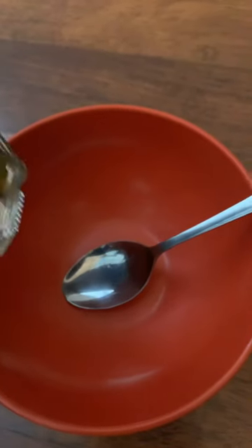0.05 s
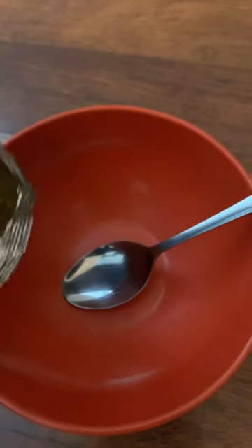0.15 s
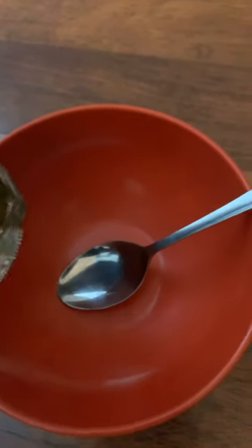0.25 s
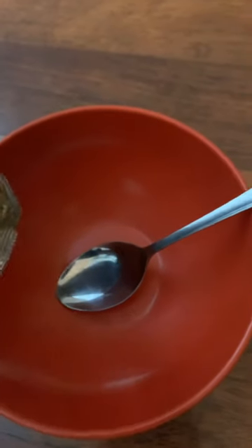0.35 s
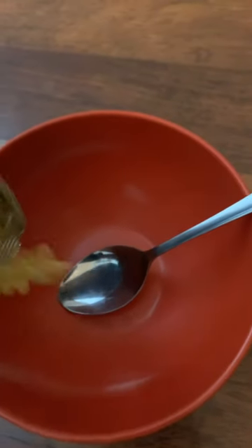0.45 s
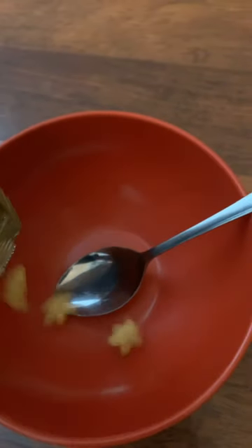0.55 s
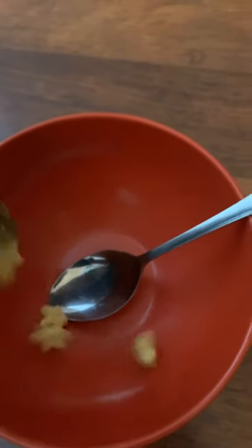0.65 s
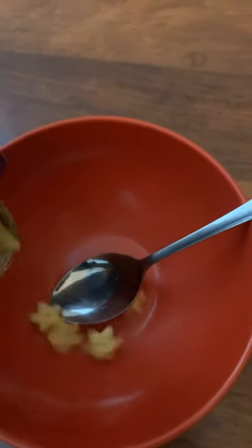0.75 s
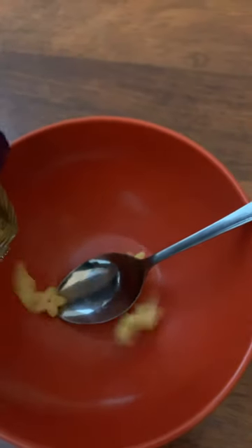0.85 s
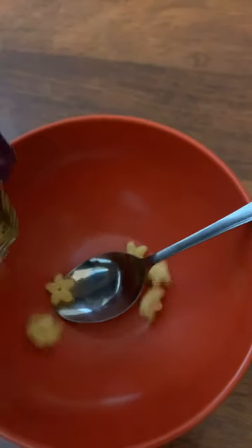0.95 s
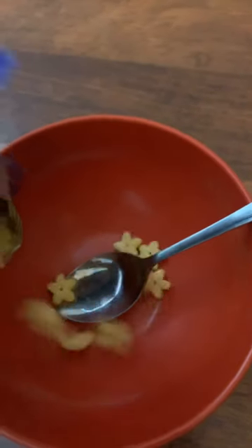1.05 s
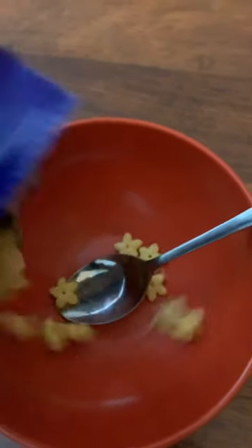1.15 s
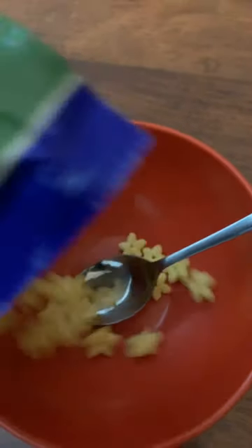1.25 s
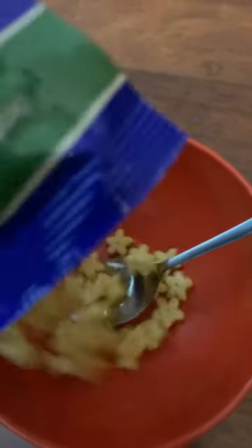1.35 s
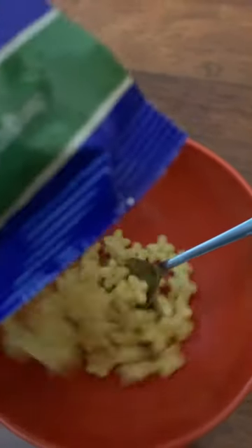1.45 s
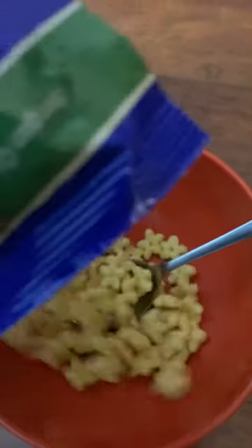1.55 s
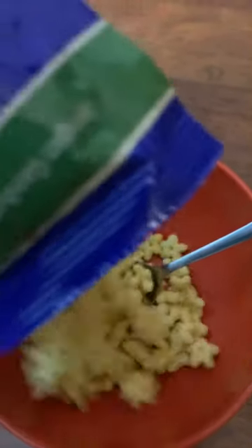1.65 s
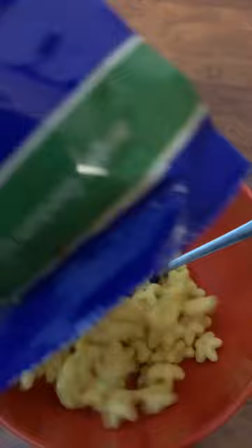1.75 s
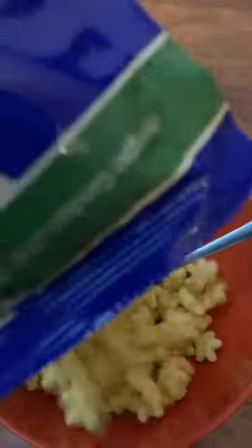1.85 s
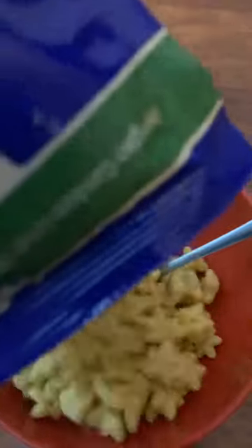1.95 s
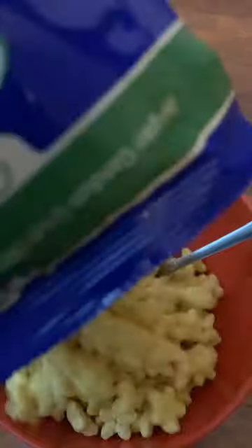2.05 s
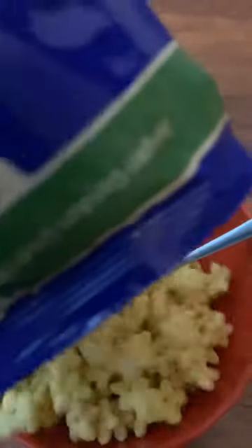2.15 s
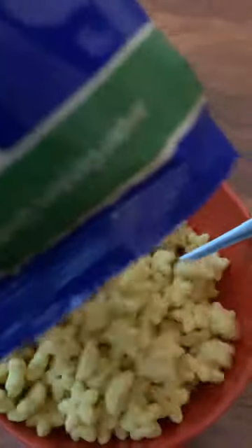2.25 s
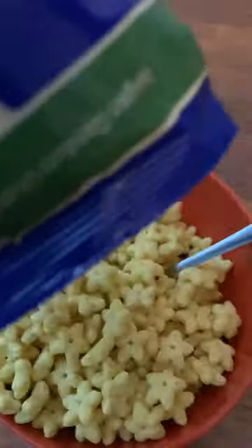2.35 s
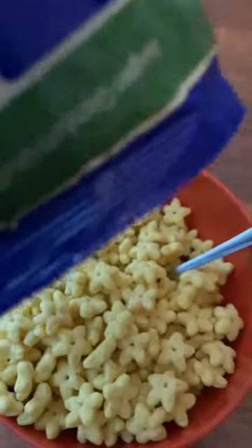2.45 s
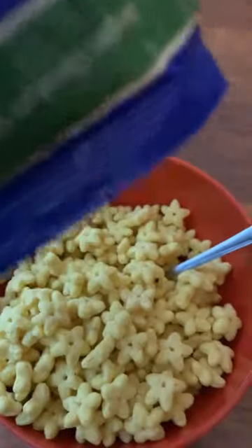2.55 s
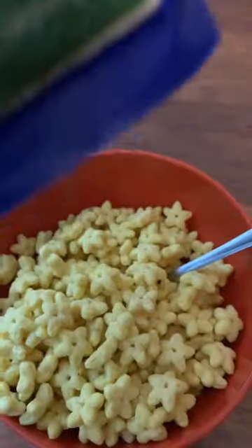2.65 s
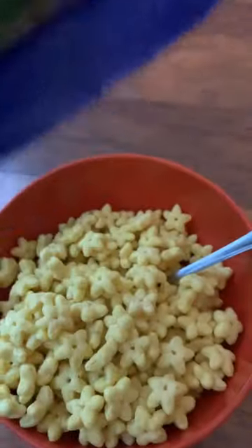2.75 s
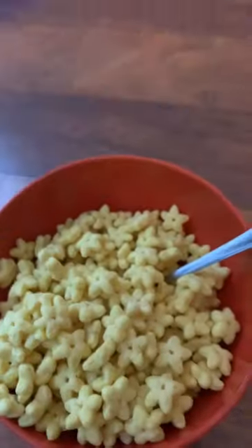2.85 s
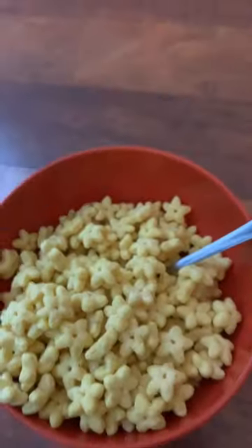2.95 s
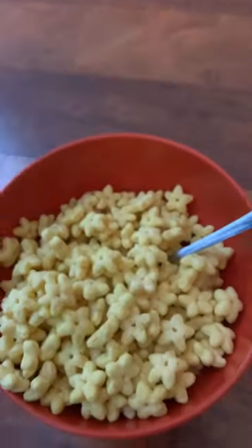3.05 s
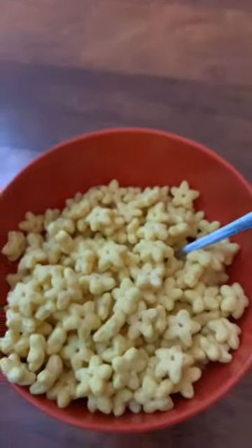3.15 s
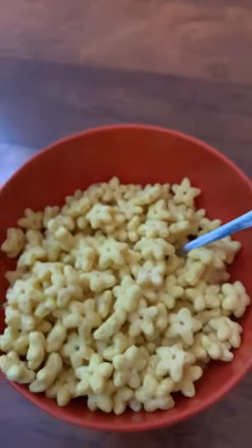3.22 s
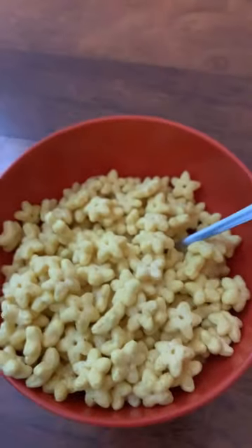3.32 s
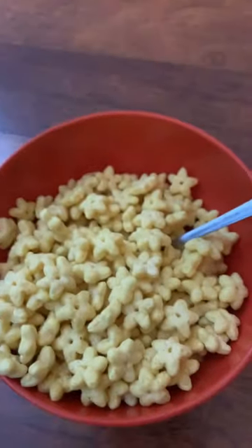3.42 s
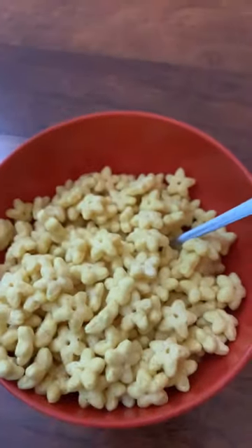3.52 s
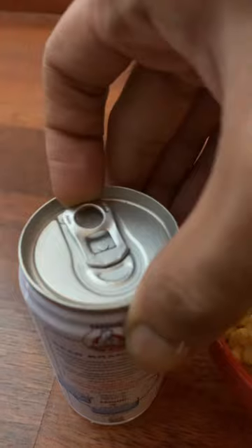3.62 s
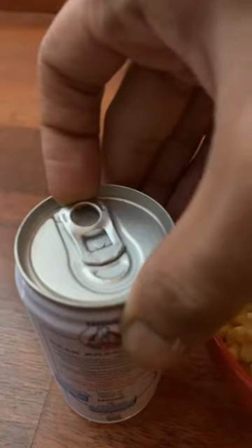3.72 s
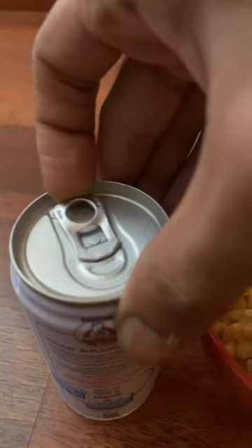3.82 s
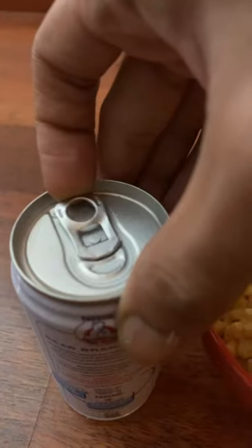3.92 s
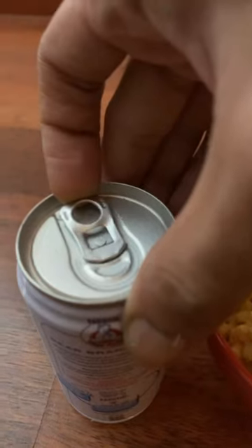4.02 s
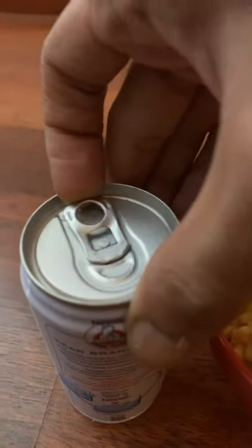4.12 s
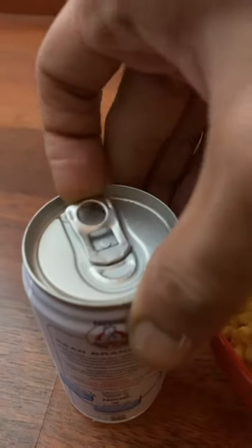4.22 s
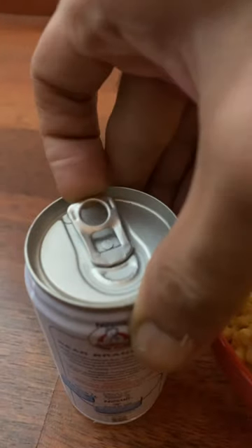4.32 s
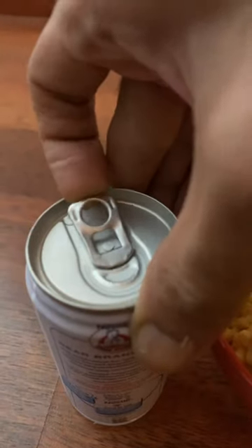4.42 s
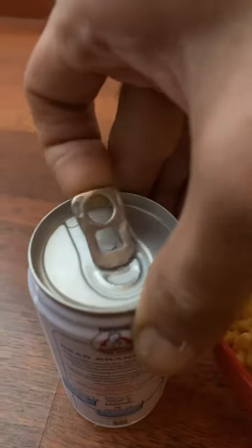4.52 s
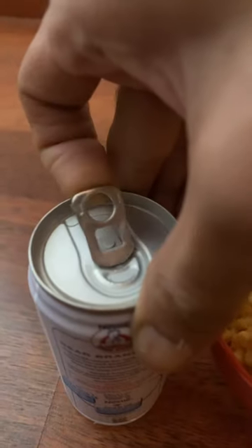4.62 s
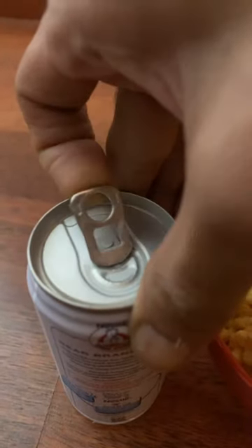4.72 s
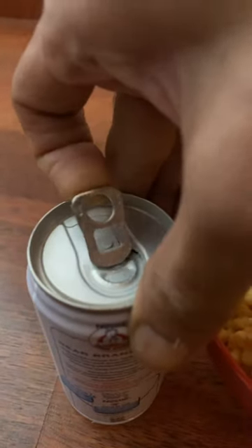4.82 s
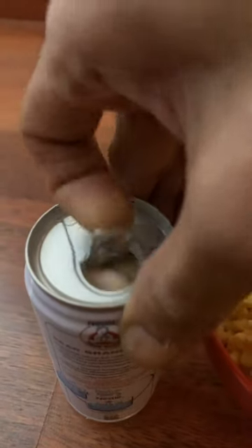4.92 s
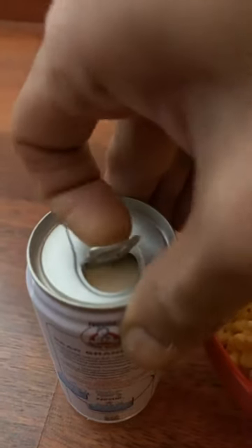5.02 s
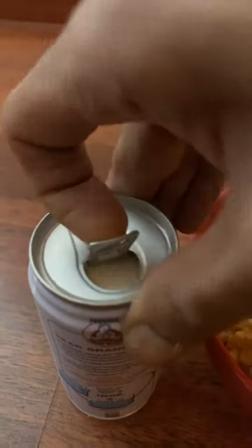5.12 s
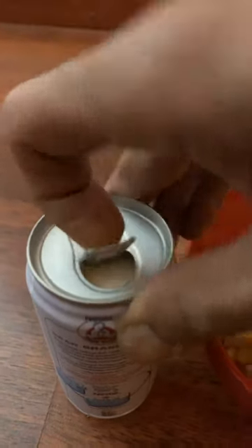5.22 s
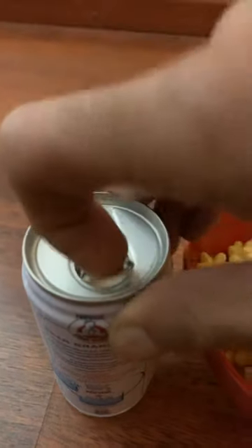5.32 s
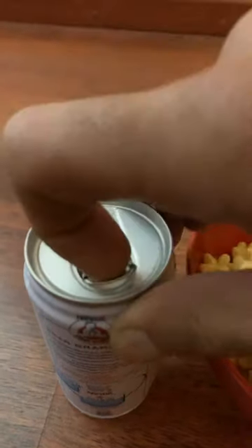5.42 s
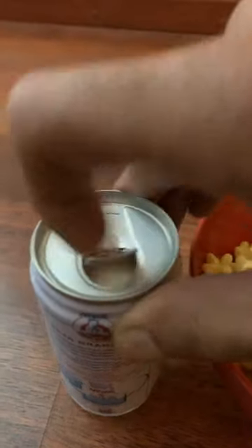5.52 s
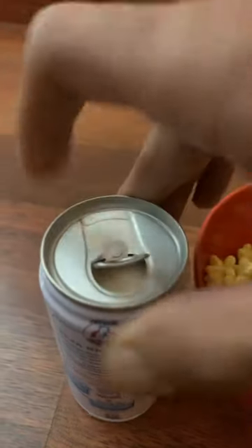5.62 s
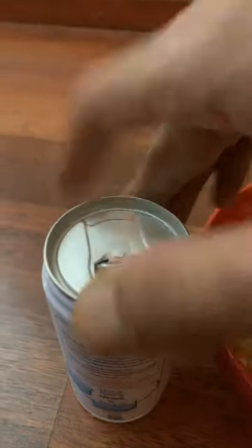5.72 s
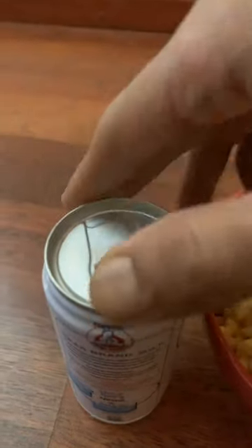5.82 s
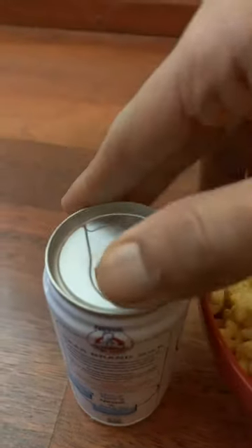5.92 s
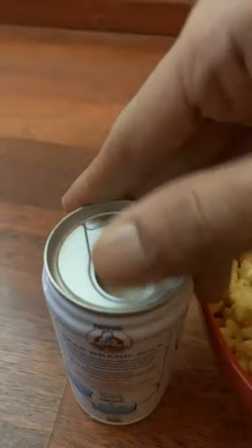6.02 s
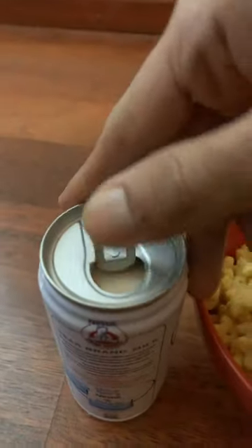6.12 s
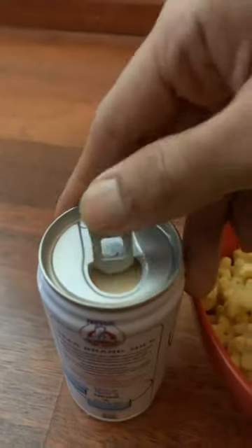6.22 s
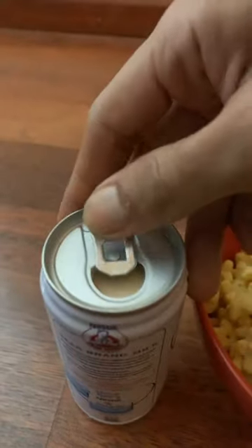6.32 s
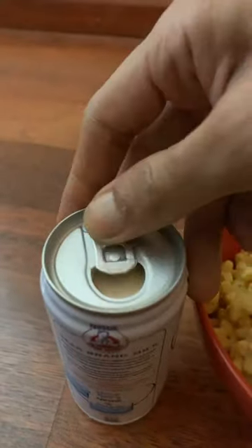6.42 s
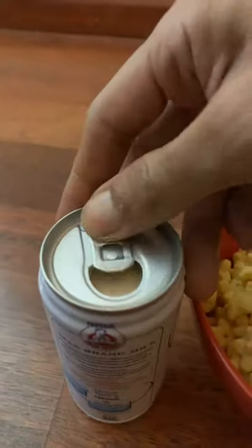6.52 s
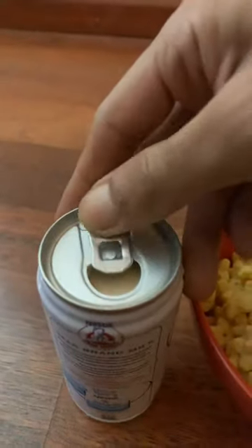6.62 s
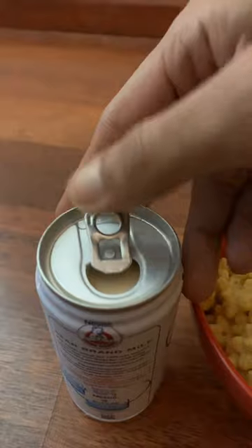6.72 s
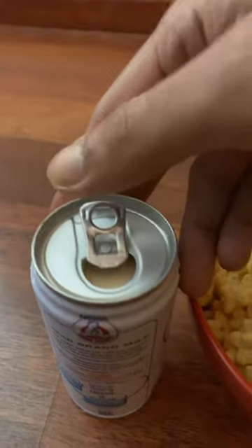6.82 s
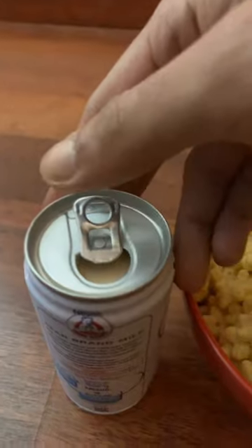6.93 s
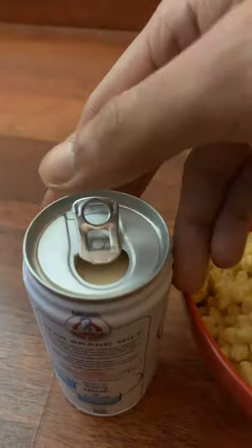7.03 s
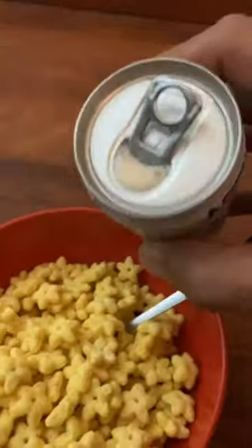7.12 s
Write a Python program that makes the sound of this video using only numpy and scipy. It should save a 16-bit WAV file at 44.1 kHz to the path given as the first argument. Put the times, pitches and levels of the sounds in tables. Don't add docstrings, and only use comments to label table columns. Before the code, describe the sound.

A close, bright rush of cereal fills a plastic bowl and stops; later two sharp metallic can cracks ring in a small room.

```python
import sys
import numpy as np
from scipy import signal
from scipy.fft import rfft, irfft, next_fast_len
from scipy.io import wavfile
from scipy.ndimage import uniform_filter1d

SR = 44100
rng = np.random.default_rng(int(sys.argv[2]) if len(sys.argv) > 2 else 0)


def gain_from_db(level_db):
    decades = np.asarray(level_db, float) / 20
    return 10 ** decades


def generate_wav(sig):
    pcm = np.round(np.clip(np.atleast_2d(sig).T, -1, 1) * 32767).astype(np.int16)
    wavfile.write(sys.argv[1], SR, pcm)


N = 316197


def evened(x):
    return x / np.sqrt(np.mean(x ** 2) + 1e-20)


def peaked(x):
    return x / (abs(x).max() + 1e-20)


def read(points, hz, column=1):
    rows = np.array(points)
    return np.interp(np.log(hz + 1), np.log(rows[:, 0] + 1), rows[:, column])


def add(mix, s, sound):
    part = mix[round(s * SR):][:len(sound)]
    part += sound[:len(part)]


def coloured(x, points):
    size = next_fast_len(len(x))
    gain = gain_from_db(read(points, np.fft.rfftfreq(size, 1 / SR)))
    return evened(irfft(rfft(x, size) * gain, size)[:len(x)])


def causal(points, size=512):
    db_floor = -60
    gain = gain_from_db(np.maximum(read(points, abs(np.fft.fftfreq(size, 1 / SR))), db_floor))
    return np.fft.ifft(np.exp(np.conj(signal.hilbert(np.log(gain))))).real


def wander(rate_hz):
    steps = rng.standard_normal(N)
    return evened(signal.lfilter(*signal.butter(2, rate_hz, fs=SR), steps))


def follow(curve):
    t, (s, db) = np.arange(N) / SR, np.transpose(curve)
    fall_db_per_s = 121
    return np.interp(t, s, db) - fall_db_per_s * np.maximum(t - s[-1], 0)


def rings(modes, size=2048):
    t, out = np.arange(size) / SR, np.zeros(size)
    for hz, db, t60 in modes:
        decay = gain_from_db(db - 60 * t / max(t60, .001))
        out += decay * np.sin(2 * np.pi * hz * t) * (1 - np.exp(-hz * t))
    return out


def burst(length, dense):
    chance, signs = rng.random(2048), rng.standard_normal(2048)
    clicks = signs * (chance < dense)
    clicks[0] = 2.0
    u = (np.arange(2048) + 8) / SR / np.clip(length, .0001, .03)
    return clicks * np.minimum(0.27 + u, 1) * np.exp(-u)


def struck(clicks, modes, size=2048):
    return peaked(signal.fftconvolve(clicks, rings(modes, size)))


# [f/Hz, level/dB]
RATTLE = [(1470, -34.5), (2500, -11), (2920, -29), (3660, -14.5), (4510, -11.5), (4990, -2), (5310, -3.5),
          (5830, 0.5), (7360, -2), (8600, -7), (9290, -6.5), (9660, -7.5), (14100, -13), (15300, -16),
          (16000, -29.5)]
# [f/Hz, level/dB, t60/s]
BOWL = [(2400, -6.5, 0.028), (4975, -8, 0.037), (5950, -1.5, 0.018), (6700, -3, .025), (7080, -8, 0.037),
        (7450, -2.5, 0.011), (9114, 0, 0.027)]
# [t/s, level/dB]
STREAM = [(0.0, -81), (.16, -57.5), (.4, -46.5), (.47, -53.5), (.6, -46.5), (.66, -41), (.76, -46),
          (.9, -44), (.95, -44), (1.2, -39.5), (1.3, -30), (1.5, -28), (1.68, -28), (1.87, -31.5),
          (2.24, -34.5), (2.37, -49.5), (2.55, -63.5), (2.68, -87)]
# [t/s, level/dB]
BRIGHT = [(.16, -24), (.42, -6), (.9, -6.5), (1.35, -11), (2.5, -14.5)]


def rattle(per_s=5000, spread_db=2.0, clump_db=2.5, ring_s=0.02):
    sizes = gain_from_db(spread_db * np.minimum(rng.exponential(1, N), 5)) * (rng.random(N) < per_s / SR)
    kinds, out = rng.integers(0, 24, N), np.zeros(N)
    for k, pitches in enumerate(rng.uniform(2500, 16000, (24, 4))):
        hollow = rings([(f, 0, ring_s) for f in pitches], size=600)
        out += signal.oaconvolve(sizes * (kinds == k), hollow)[:N]
    wall = signal.oaconvolve(sizes, rings(BOWL))[:N]
    out = evened(out) + gain_from_db(-8.5) * evened(wall)
    hz, power = signal.welch(out, SR, nperseg=128)
    flatten = list(zip(hz, -10 * np.log10(power + 1e-3 * power.max())))
    out = coloured(coloured(out, flatten), RATTLE)
    out *= gain_from_db(clump_db * wander(52))
    top = signal.sosfilt(signal.butter(4, 9500, "high", fs=SR, output="sos"), out)
    body = signal.sosfilt(signal.butter(4, 9500, fs=SR, output="sos"), out)
    return gain_from_db(follow(STREAM)) * (evened(body) + gain_from_db(follow(BRIGHT)) * evened(top))


# [t/s, level/dB, f/Hz]
PIECES = [(0.5909, -8, 5553), (0.6244, -23, 5700), (0.6747, -12, 6077), (0.7278, -16, 7000),
          (0.7453, -17, 5600), (0.764, -14.5, 5530), (0.781, -18, 2400), (0.8417, -17.5, 5845),
          (0.856, -21.5, 2330), (0.8884, -33, 5920), (0.9262, -12, 5750), (0.956, -20, 5960),
          (0.9703, -17.5, 5920), (0.9916, -17.5, 6260), (1.0281, -25.5, 7340), (1.0944, -20.5, 8200),
          (1.16, -19, 6530), (1.176, -10, 6630), (1.2063, -14.5, 7080), (1.2285, -11, 4910),
          (1.2545, -12.5, 7050), (1.27, -16, 5820), (1.298, -19.5, 6300)]
# [t/s, level/dB, f/Hz]
STRAGGLERS = [(2.1614, -11.5, 6940), (2.1785, -12.5, 6100), (2.195, -21.5, 6270), (2.2098, -12, 6720),
              (2.2318, -21.5, 6400), (2.2981, -21, 5770), (2.3512, -29, 5530), (2.3795, -26.5, 6460),
              (2.4183, -29.5, 6300), (2.4648, -28, 6600), (2.4953, -34.5, 6730), (2.5294, -42, 6230)]
# [t/s, level/dB, f/Hz, treble level/dB]
TUMBLES = [
    (0.5735, -9.5, 7630, -16.5),
    (0.648, -12.5, 5880, -18),
    (0.793, -12.5, 2447, -13),
    (0.9334, -9, 5860, -21),
    (1.05, -17, 5910, -6),
    (1.0758, -8, 7620, -5.5),
    (1.1278, -13.5, 6750, -19),
    (1.2874, -11.5, 6600, -16.5),
    (1.3315, -8, 5960, -16),
    (1.6976, -7, 7150, -20),
]
# [t/s, level/dB, f/Hz, treble level/dB]
HEAPS = [
    (1.393, -15.5, 4960, -19),
    (1.4352, -11, 7300, -20.5),
    (1.482, -11, 5437, -15),
    (1.519, -9, 7580, -22.5),
    (1.5508, -6, 5950, -23.5),
    (1.6826, -14.5, 7500, -15),
    (1.815, -13.5, 6610, -9.5),
    (2.1337, -17, 6150, -16.5),
]


def landings():
    bare = [(*row, -4.5, -18, .0025) for row in PIECES]
    settling = [(*row, -2, -18, .0025) for row in STRAGGLERS]
    tumbles = [(s, db, hz, -9.5, treble_db, 0.01) for s, db, hz, treble_db in TUMBLES]
    heaps = [(s, db, hz, -2, treble_db, 0.0038) for s, db, hz, treble_db in HEAPS]
    return bare + settling + tumbles + heaps


def pieces(piece_s=0.012):
    out, colour = np.zeros(N), np.pad(causal(RATTLE), (0, 1536))
    edge = signal.butter(4, 9500, "high", fs=SR, output="sos")
    for s, db, hz, ring_db, treble_db, bounce in landings():
        clicks = burst(bounce, 0.4)
        sound = peaked(signal.fftconvolve(clicks, colour))
        hollow = [(hz, 0, piece_s * (6000 / hz) ** 1.3), (hz * 1.26, -6, piece_s)]
        sound += gain_from_db(ring_db) * struck(clicks, hollow)
        sound[:2048] += gain_from_db(treble_db) * peaked(signal.sosfilt(edge, clicks))
        add(out, s, gain_from_db(db - 4.5) * sound)
    return out


# [f/Hz, level/dB, t60/s]
SPOON = [(13660, -14, .15), (13800, -2, 0.11)]
# [f/Hz, level/dB, t60/s]
SPOON_LOW = [(3650, 7, 0.21)]
# [t/s, level/dB, low ring level/dB, free to ring/s]
SPOON_HITS = [
    (0.5726, -16.5, -11, 0.055),
    (0.6734, -35.5, -5, 0.04),
    (0.7781, -30, -7, 0.08),
    (0.7964, -41.5, -1, 0.045),
    (1.0475, -32.5, -20.5, 0.048),
    (1.132, -18.5, -26, 0.042),
    (1.18, -29.5, -22, 0.04),
    (1.2284, -27.5, -22, 0.035),
    (1.2865, -29.5, -9, 0.12),
]


def spoon():
    out, t = np.zeros(N), np.arange(9000) / SR
    for s, db, low_db, free in SPOON_HITS:
        damped = np.exp(-np.maximum(t - free, 0) / .008)
        tone = rings(SPOON, size=9000) + gain_from_db(low_db - 4.5) * rings(SPOON_LOW, size=9000)
        add(out, s, gain_from_db(db - 7) * damped * tone)
    return out


# [t/s, level/dB]
GUSTS = [(0.0, -42), (.4, -28.5), (.88, -37), (1.19, -30), (1.68, -44.5), (1.92, -39)]


def gusts():
    t = np.arange(N) / SR
    breeze = -47.5 - 24.5 * np.maximum(t - 1.4, 0)
    return np.max([breeze] + [db - 301 * abs(t - s) for s, db in GUSTS], axis=0)


# [f/Hz, level/dB]
RUMBLE = [(35, -46.5), (60, -25.5), (225, 1), (429, 0), (771, -4.5), (879, -1), (1030, -10.5), (1130, -7.5),
          (2000, -15), (2600, -39), (4400, -120)]
# [f/Hz, level/dB]
RUSTLE = [(470, -30.5), (800, -5), (884, -1), (1150, -3.5), (2910, -8), (3600, -7), (4510, -12.5),
          (7830, -24), (16000, -34)]
# [t/s, level/dB]
SHAKE = [(0.0, -53.5), (.16, -54), (.4, -39.5), (.47, -46), (.6, -40), (.66, -53.5), (.8, -45.5), (.9, -52),
         (.95, -46.5), (1.02, -50.5), (1.32, -44), (1.43, -42), (1.59, -42), (2.04, -38.5), (2.15, -42),
         (2.24, -52.5), (2.37, -55), (2.62, -80)]


def bag():
    rumble = coloured(rng.standard_normal(N), RUMBLE) * gain_from_db(2.63 * wander(55))
    air_colour = [(30, -21.5), (70, -4), (170, 6.5), (260, -24), (900, -80)]  # Hz, dB
    draught = coloured(rng.standard_normal(N), air_colour)
    creases = gain_from_db(4.95 * np.minimum(rng.exponential(1, N), 5)) * rng.standard_normal(N)
    creases *= rng.random(N) < 3000 / SR
    crinkle = coloured(creases + 1.4 * rng.standard_normal(N), RUSTLE) * gain_from_db(2.86 * wander(34))
    hand, load = gain_from_db(follow(SHAKE) + 3), gain_from_db(follow(STREAM) - 8.5)
    moving = np.hypot(hand, load) * evened(rumble)
    return moving + gain_from_db(follow(SHAKE)) * evened(crinkle) + gain_from_db(gusts() - 5) * draught


# [f/Hz, level/dB]
LID_TREBLE = [(3500, -47), (5200, -4.5), (7600, -0.5), (10500, -2), (13600, 0), (16000, -7)]


def knocks(rows, middle, low_cycles, dense):
    out, treble = np.zeros(N), np.pad(causal(LID_TREBLE), (0, 1536))
    for s, db, hz, middle_db, treble_db, length in rows:
        clicks, low_s = burst(length, dense), low_cycles / hz
        low_modes = [(hz, 0, low_s), (hz * 1.1, -7, 0.95 * low_s), (hz * .78, -12, low_s)]
        grit = burst(length, 0.67)
        sound = struck(clicks, low_modes)
        sound += gain_from_db(middle_db + 9.5) * struck(clicks, middle)
        sound += gain_from_db(treble_db + 15.0) * peaked(signal.fftconvolve(grit, treble))
        add(out, s, gain_from_db(db - 3.0) * sound)
    return out


def lasting(rows, length):
    return [(*row, length) for row in rows]


# [t/s, level/dB, f/Hz, middle level/dB, treble level/dB]
POP = [
    (.8708, -20, 212, -2.7, -1.6),
]


def bag_pop():
    return knocks(lasting(POP, 0.00078), LID, low_cycles=3.4, dense=0.56)


# [f/Hz, level/dB, t60/s]
BAG = [(892, -5, 0.027), (1339, 13, 0.0037), (1868, -3, 0.004), (3200, 2.5, 0.0018), (4200, -16.5, 0.0075)]
# [t/s, level/dB, f/Hz, middle level/dB, treble level/dB]
SNAPS = [(0.11, -44, 407, -14, -24), (0.176, -30.5, 563, -28, -22), (0.184, -51, 410, -16, -15),
         (0.201, -41, 850, -9, -16), (0.373, -28, 510, -9.5, -12), (1.297, -23, 275, -4.5, -19),
         (2.6, -34, 501, -7.5, -44), (2.896, -36.5, 355, -7.5, -52), (3.008, -45.5, 313, -17, -34),
         (3.154, -56.5, 364, -2, -28), (3.47, -42, 1000, -6.5, -24), (3.482, -49, 309, -5, -28),
         (3.504, -49, 334, 0, -32), (3.587, -46, 589, -8.5, -37)]
# [t/s, level/dB, f/Hz, middle level/dB, treble level/dB]
THUMB = [
    (5.62, -28.5, 416, -15.5, -42),
    (5.716, -47, 397, -25, -26.5),
    (6.668, -46, 486, -12.5, -35),
]


def snaps_and_thumb():
    return knocks(lasting(SNAPS + THUMB, 0.001), BAG, low_cycles=14, dense=0.13)


# [f/Hz, level/dB, t60/s]
LID = [(2110, -2, 0.0094), (2760, -1.5, 0.0069), (3436, -3.5, 0.0075), (3830, 4.5, 0.0038),
       (4260, 3, 0.0034), (5180, -4.5, 0.0052)]
# [t/s, level/dB, f/Hz, treble level/dB, length/s]
CRACKS = [
    (4.496, -27, 1370, -45, 0.0079),
    (4.504, -15.5, 1870, -36.5, 0.0054),
    (4.509, -0.5, 1389, -21, 0.00033),
    (4.874, -29.5, 2000, -11.5, 0.0056),
    (4.885, -7, 1710, -12.5, 0.0045),
    (4.887, -8, 1465, -8.5, .0011),
    (4.486, -45, 1507, -22.5, 0.0043),
]


def cracks():
    rows = [(s, db, hz, -10, treble_db, length) for s, db, hz, treble_db, length in CRACKS]
    return knocks(rows, LID, low_cycles=8.8, dense=0.12)


# [f/Hz, level/dB, t60/s]
TAB_RING = [(2155, 3.5, 0.01), (2910, 6, 0.0049), (3130, -1, 0.017), (3900, -16, 0.0077)]
# [t/s, level/dB, f/Hz, middle level/dB, treble level/dB]
TAB = [(5.076, -30, 1443, -15, -35.5), (5.086, -35.5, 1604, -16, -45), (5.322, -29.5, 1590, -12.5, -23.5),
       (5.535, -47, 1540, -9, -34), (5.543, -41, 1415, -18.5, -26), (5.556, -29, 1715, -22.5, -31),
       (5.564, -26, 1105, -16, -27.5), (5.571, -20.5, 1100, -18.5, -26.5), (5.907, -50, 1389, -13, -40),
       (6.145, -58.5, 1496, -12, -39.5), (7.051, -49, 1000, -33, -40)]
# [t/s, level/dB, f/Hz, middle level/dB, treble level/dB]
TICKS = [
    (4.758, -53, 1500, -11, 2),
    (4.794, -46.5, 1500, -4, -4.5),
    (4.8195, -31, 1500, -5.5, -2),
    (6.483, -40, 1785, -12, -14.5),
]


def tab():
    slips = knocks(lasting(TAB, 0.0032), TAB_RING, low_cycles=21, dense=0.22)
    return slips + knocks(lasting(TICKS, 0.0029), LID, low_cycles=15, dense=0.87)


# [t/s, level/dB, f/Hz, length/s]
PUFF = (4.514, -33, 55, .012)


def puff():
    s, db, hz, length = PUFF
    t, out = np.arange(round(.1 * SR)) / SR, np.zeros(N)
    swell = t / length * np.exp(2 - 2 * t / length)
    add(out, s, gain_from_db(db) * np.sin(2 * np.pi * hz * t) * swell)
    return out


# [t/s, level/dB, length/s, colour as (f/Hz, level/dB)]
SENT = [
    (4.5082, -3.5, .0002, [(150, -50), (250, -20), (717, -14.5), (781, -14), (1430, 1.5), (1890, -14), (3300, -16.5), (4350, -2.5), (5310, -10), (6770, -12.5), (8320, -21.5), (10100, -16.5), (15500, -22)]),
    (4.886, -10, .002, [(150, -50), (250, -9), (516, -9.5), (658, -8), (1220, -19.5), (1410, -10.5), (2060, -4), (2950, -13.5), (5040, -5.5), (13700, -9), (15500, -19)]),
]


def sent():
    out = np.zeros(N)
    for s, db, length, colour in SENT:
        slips = rfft(burst(length, 0.93))
        even = irfft(slips / abs(slips))[:512]
        tear = signal.fftconvolve(even, causal(colour))
        add(out, s, gain_from_db(db + 18.0) * tear / np.linalg.norm(tear))
    return out


# [f/Hz, t60/s, level/dB]
ROOM = [(200, 0.34, -9), (1000, 0.37, -7), (2500, .45, -9.5), (5000, 0.38, -5.5), (9100, .35, -6.5),
        (15000, 0.18, -4)]
# [delay t/s, level/dB]
WALLS = [
    (0.0181, -13.5),
    (0.0247, -20),
    (.030, -20.5),
    (.036, -20.5),
    (.054, -18.5),
]


def room(x, first_s=0.0095, rise_s=0.012):
    taps = np.zeros(SR // 2)
    at = np.arange(0, SR // 2 - 8, 8)
    taps[at + rng.integers(0, 8, len(at))] = rng.choice([-1., 1.], len(at))
    hz, t, z = signal.stft(taps, SR, nperseg=128)
    z = z * gain_from_db(read(ROOM, hz, column=2)[:, None] - 60 * t / read(ROOM, hz)[:, None])
    tail = 0.077 * signal.istft(z, SR, nperseg=128)[1]
    t = np.arange(len(tail)) / SR
    tail *= np.clip((t - first_s) / rise_s, .2, 1) * (t > .002)
    thin = signal.butter(1, [2500, 8000], "band", fs=SR, output="sos")
    echo = signal.sosfilt(thin, signal.unit_impulse(64))
    for delay, db in WALLS:
        add(tail, delay, gain_from_db(db) * echo)
    return signal.fftconvolve(x, tail)[:N]


# [f/Hz, level/dB]
HUM = [(26, -28), (45, -1), (112, 0), (197, -12), (306, -11.5), (453, -20), (798, -21.5), (902, -24),
       (1480, -33), (1890, -30.5), (2130, -43.5), (2530, -44.5), (4680, -41), (8870, -50.5), (16000, -58)]
# [f/Hz, width/Hz, raised level/dB]
HUM_BANDS = [(740, 66, 7.5), (1906, 120, 10), (3050, 180, 6.5), (4754, 250, 5.5), (5320, 49, 6),
             (10500, 460, 9.5), (15780, 500, 8)]


def hum():
    frames, hz = N // 256 + 5, np.fft.rfftfreq(1024, 1 / SR)
    a, b, patches = rng.standard_normal((frames, 513, 3)).T
    patches = evened(uniform_filter1d(uniform_filter1d(patches, 6, 0), 8, 1))
    shape_db = read(HUM, hz)
    for f, width, db in HUM_BANDS:
        shape_db = shape_db + db * np.exp(-((hz - f) / width) ** 2)
    z = (a + 1j * b) * gain_from_db(shape_db[:, None] + 2.6 * patches)
    return gain_from_db(-53.5) * evened(signal.istft(z, nperseg=1024, noverlap=768)[1][:N])


# [t/s, level/dB]
MAINS = [(0, -52), (2.6, -56.5), (3.05, -57), (3.58, -56.5), (3.62, -62.5), (5.199, -65), (6.4, -58),
         (7.17, -64)]


def drone():
    s, db = np.transpose(MAINS)
    turns = np.cumsum(101 + 5.0 * wander(6)) / SR
    level_db = np.interp(np.arange(N) / SR, s, db) - 3.5 + 2.8 * wander(4.9)
    return gain_from_db(level_db) * np.sqrt(2) * np.sin(2 * np.pi * turns)


def scene():
    bowl = rattle() + pieces() + spoon() + bag() + bag_pop()
    soft, opening, bending = snaps_and_thumb(), cracks(), tab()
    to_walls = gain_from_db(-2.0) * bowl + gain_from_db(2.0) * soft + gain_from_db(-2.5) * bending + gain_from_db(-9.0) * opening + sent()
    close = bowl + soft + bending + opening
    return (close + room(to_walls) + puff() + hum() + drone())[None]


def low_pass(x):
    return signal.sosfilt(signal.butter(12, 16800, fs=SR, output="sos"), x)


# [silence from t/s, sound again t/s, suppression settled t/s, hiss level/dB]
CUTS = [
    (3.591, 3.608, 3.685, -64),
    (7.061, 7.078, 7.157, -64.5),
]
# [f/Hz, level/dB]
HISS = [(590, -31), (1000, -2), (1140, -9), (1930, -7), (10900, -15), (15700, -27), (16500, -36)]


def record(dry):
    t, hiss = np.arange(N) / SR, coloured(rng.standard_normal(N), HISS)
    out = signal.sosfilt(signal.butter(4, 43, btype="high", fs=SR, output="sos"), dry)
    for stop, start, settled, db in CUTS:
        out = out + gain_from_db(db) * hiss * (t > start) * (t < settled)
        out = out * np.where((t > stop) & (t < start), gain_from_db(-30), 1)
    low = signal.oaconvolve(out, signal.firwin(511, 15950, fs=SR)[None], "same")
    finished = low + gain_from_db(-30) * (out - low)
    return low_pass(finished)


dry = scene()
out = record(dry)
generate_wav(out)
```